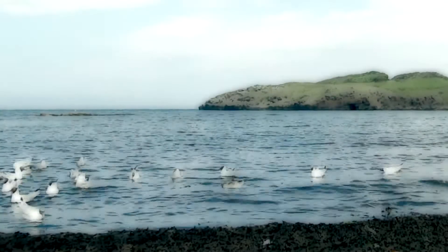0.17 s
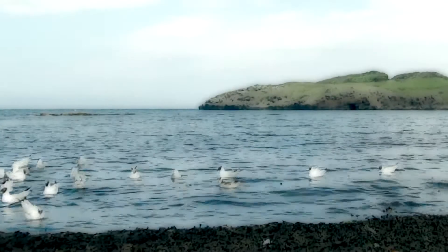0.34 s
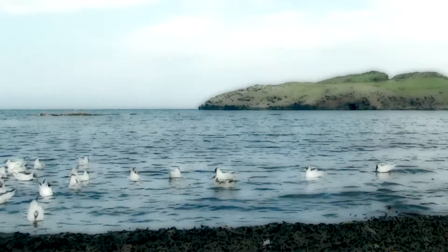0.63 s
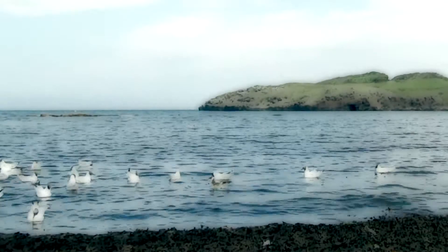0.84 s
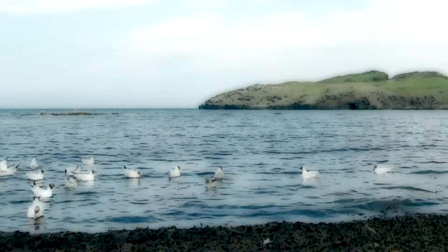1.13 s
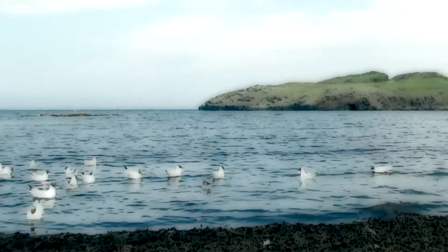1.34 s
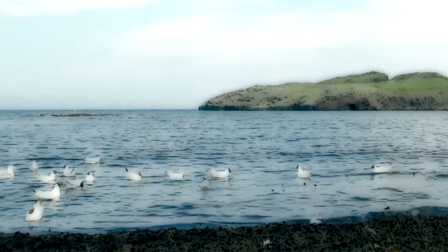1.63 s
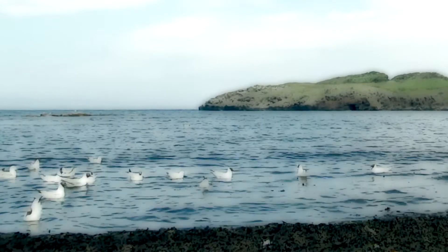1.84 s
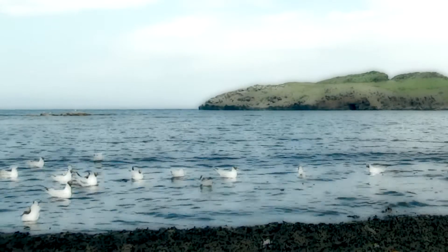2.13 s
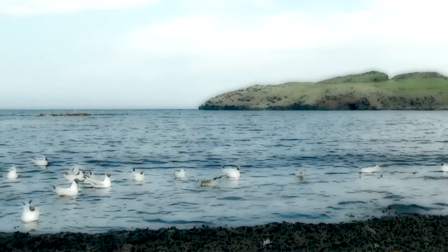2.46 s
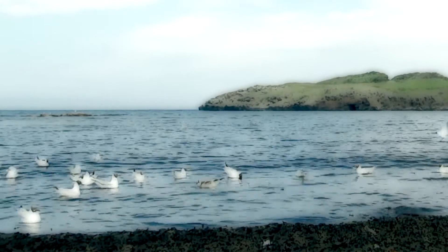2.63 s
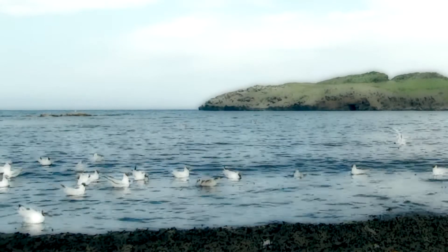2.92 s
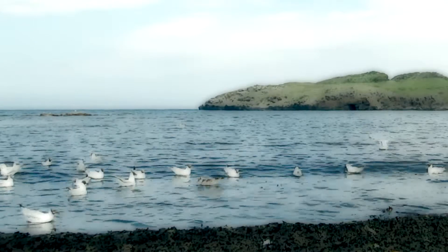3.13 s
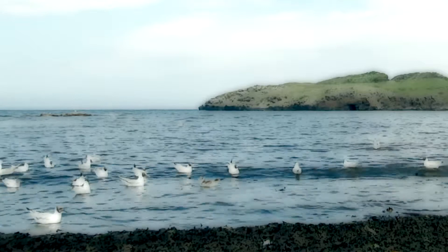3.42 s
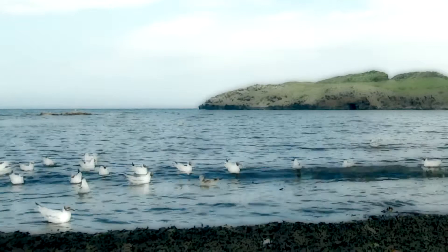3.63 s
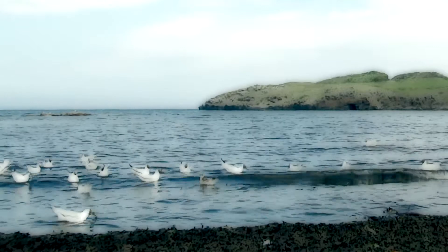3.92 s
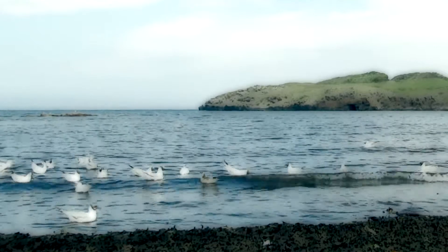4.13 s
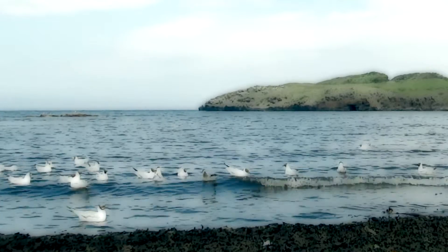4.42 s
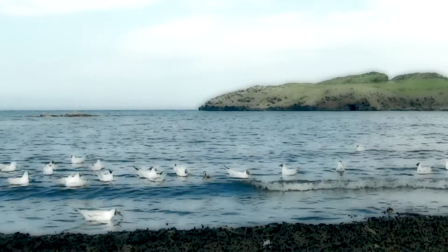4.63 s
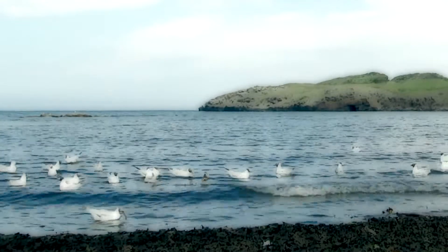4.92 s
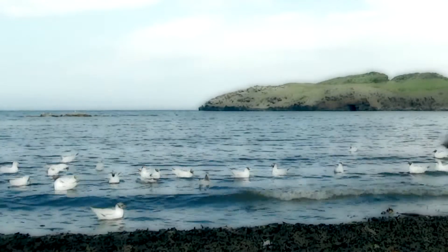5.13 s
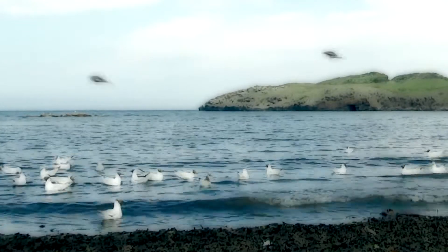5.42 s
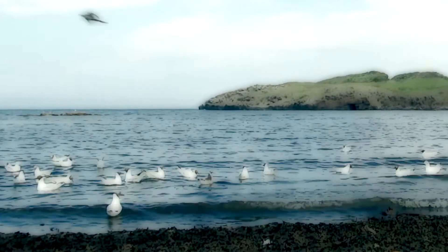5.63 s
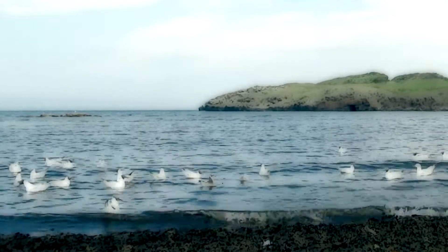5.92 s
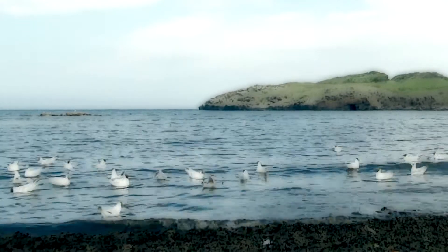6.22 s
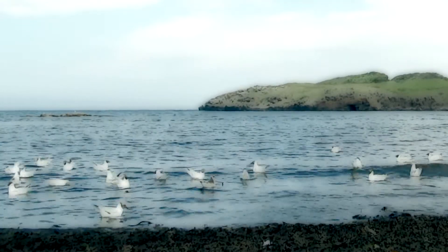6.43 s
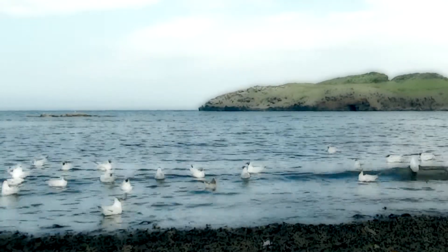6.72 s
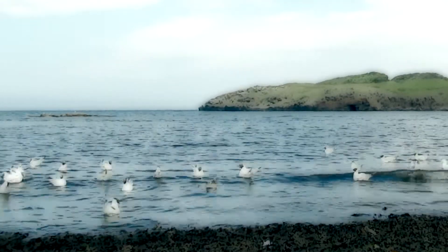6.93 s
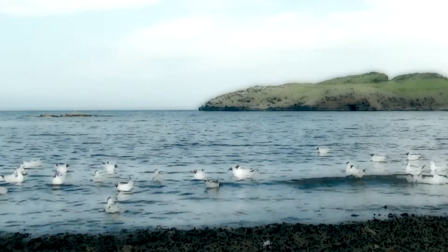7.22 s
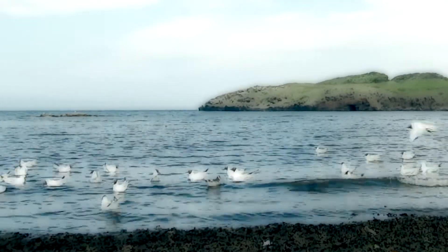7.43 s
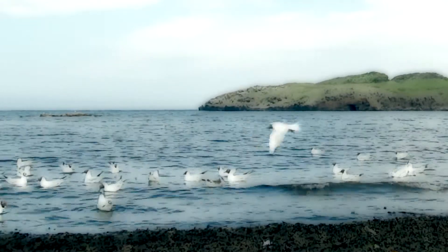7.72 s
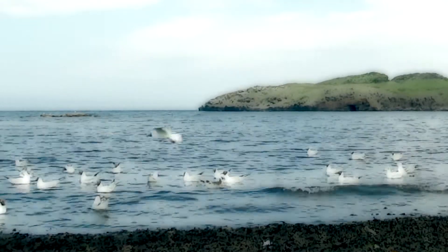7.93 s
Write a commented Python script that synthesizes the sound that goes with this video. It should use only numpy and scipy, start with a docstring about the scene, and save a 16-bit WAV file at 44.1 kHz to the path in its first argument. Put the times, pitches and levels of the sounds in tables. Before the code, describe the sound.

A flock of gulls calls on shallow water off a pebble beach, mixing short yelps, squeaks, wails and hoarse rattles. A quick run of loud barks comes early, then the cries grow more scattered. Small waves wash softly underneath, with faint fizzing foam and distant gull chatter. Gusts of wind hit the microphone with a dull rumble and lumpy thumps, strongest around the middle.

```python
"""On shallow water off a pebble beach, a flock of gulls barks, yelps, squeaks, wails and rattles.
Each cry is a stack of harmonics (whole multiples of one pitch) shaped by the bird's throat and bill.
Farther birds blur into the wash of small waves, and foam fizzes on the pebbles.
Gusts of wind buffet the microphone with a dull rumble and lumpy puffs."""
import sys
import numpy as np
from scipy import signal
from scipy.fft import rfft, irfft, next_fast_len
from scipy.io import wavfile
from scipy.ndimage import uniform_filter1d, map_coordinates

SR = 44100
rng = np.random.default_rng(int(sys.argv[2]) if len(sys.argv) > 2 else 0)


def digitize_waveform(pressure):
    """Quantize a signal to 16-bit integers and store it at the path in sys.argv[1].

    Rows of a 2-D input are taken as channels; values are limited to [-1, 1].
    """
    field = np.atleast_2d(pressure).T
    bounded = np.clip(field, -1, 1)
    quanta = np.round(bounded * 32767).astype(np.int16)
    wavfile.write(sys.argv[1], SR, quanta)


N = 356107


def amp(db):
    """Turn decibels into a plain multiplier."""
    return 10 ** (np.asarray(db) / 20)


def unit(x):
    """Scale a sound to an average (rms) strength of 1."""
    return x / np.sqrt(np.mean(x ** 2) + 1e-20)


def gain_at(points, hz):
    """Read a multiplier off (frequency_hz, level_db) points, on a log frequency axis."""
    point_hz, point_db = np.transpose(points)
    return amp(np.interp(np.log(hz + 1), np.log(point_hz + 1), point_db))


def over_time(points):
    """Join (time_s, value) points with straight lines, one value per sample."""
    return np.interp(np.arange(N) / SR, *np.transpose(points))


def wobble(per_s):
    """A smooth curve through per_s random values a second."""
    return map_coordinates(rng.standard_normal(int(N * per_s / SR) + 4), [np.arange(N) * per_s / SR])


def filtered(x, response):
    """Turn each frequency up or down by response(hz)."""
    size = next_fast_len(N + SR // 2)
    return irfft(rfft(x, size) * response(np.fft.rfftfreq(size, 1 / SR)), size)[:N]


def rush(spectrum, patchy_db):
    """Rushing noise with the given tone and short, wide patches that are louder or softer."""
    bands = signal.stft(rng.standard_normal(N), nperseg=512)[2]
    patches = uniform_filter1d(rng.standard_normal(bands.shape), size=24, axis=0)
    patches = uniform_filter1d(patches, size=7, axis=1)
    noise = signal.istft(bands * amp(patchy_db * unit(patches)), nperseg=512)[1][:N]
    return unit(filtered(noise, lambda hz: gain_at(spectrum, hz)))


# Tone of the low wash (waves and far flock) and of its bright hiss: frequency_hz, level_db
WASH_TONE = [(24, -12), (40, 5.5), (72, -4), (214, -18.5), (518, -16.5), (796, -24), (977, -22),
             (1570, -17), (2600, -25), (4000, -50), (9000, -90)]
HISS_TONE = [(1800, -39), (2800, -0.5), (3700, -2.5), (4600, 1), (6000, -7.5), (8000, -12.5), (10000, -41)]
# How loud the wash and the hiss are: time_s, level_db
WASH_LEVELS = [(0.0, -45), (0.27, -49), (1.55, -43.5), (1.82, -46), (2.27, -44), (2.74, -44), (3.48, -42.5),
               (4.58, -45), (4.81, -49), (5.77, -47.5), (8.07, -46)]
HISS_LEVELS = [(0, -57.5), (.2, -66.5), (.6, -65.5), (.75, -61.5), (.85, -60.5), (1.3, -59), (1.9, -60),
               (2.6, -57.5), (2.88, -62), (2.95, -54), (4.5, -53), (4.85, -60), (6.2, -59.5), (6.65, -63),
               (6.82, -61), (6.9, -54.5), (8.07, -61)]

def waves():
    """The far flock melts into the wash of small waves, whose hiss comes and goes."""
    wash, hiss = rush(WASH_TONE, patchy_db=2), rush(HISS_TONE, patchy_db=2)
    swell = wobble(9.3)
    wash_db = over_time(WASH_LEVELS) + 2.05 * swell
    hiss_db = over_time(HISS_LEVELS) + 1.3 * swell
    return amp(wash_db) * wash + amp(hiss_db) * hiss


# Tone of the foam: frequency_hz, level_db
FOAM_TONE = [(5000, -40), (8000, -1.5), (10000, -1), (15700, -9.5)]
# How loud the foam is: time_s, level_db
FOAM_LEVELS = [(0, -73), (.27, -81), (1.6, -75.5), (2.85, -77), (3.3, -69), (4.1, -70.5), (4.7, -73.5),
               (5.5, -76.5), (6.78, -79), (6.9, -68.5), (7.45, -72.5), (7.7, -74), (8.07, -73)]

def foam():
    """Foam fizzes on the pebbles, with scattered pops."""
    fizz = rush(FOAM_TONE, patchy_db=.8)
    pops = 1 + 4.5 * np.clip(wobble(300) - 2.1, 0, 1)
    return amp(over_time(FOAM_LEVELS) + 0.89 * wobble(9.5)) * pops * fizz


# Gusts of wind: start_s, length_s, strength_db
GUSTS = [(0.456, .7, -32.5), (1.315, .3, -33), (2.233, .12, -27.5), (3.14, .153, -31.5),
         (3.423, 0.0401, -36), (3.601, .42, -29), (4.103, .42, -23), (4.794, 0.0274, -37),
         (5.102, .16, -34), (5.569, .26, -29), (6.082, 0.0195, -36), (6.185, .17, -28), (6.525, .13, -33),
         (6.788, .09, -34), (7.543, .13, -33.5), (7.8, .11, -29.5)]

def wind_strength(calm_db=-45.5, rise_s=0.022, fall_s=0.06):
    """The wind's strength in dB: each gust swells out of the calm, holds and dies away."""
    t = np.arange(0, N, 64) / SR
    strength = np.full(len(t), amp(calm_db))
    for start_s, length_s, db in GUSTS:
        outside = np.maximum((start_s - t) / rise_s, (t - start_s - length_s) / fall_s)
        strength += amp(db) * np.exp(-np.maximum(outside, 0))
    return np.interp(np.arange(N) / SR, t, 20 * np.log10(strength))


# Tone of the wind on the microphone: frequency_hz, level_db
RUMBLE_TONE = [(15, -3.5), (30, -2), (100, -1.5), (250, -25), (500, -30), (900, -61.5)]

def wind_rumble(wind_db):
    """Wind buffets the microphone with a dull, lumpy rumble."""
    lumps = amp(6.5 * np.tanh(1.5 * wobble(16)))
    return amp(wind_db - 10) * unit(lumps * rush(RUMBLE_TONE, patchy_db=4.5))


# How well a gull's throat passes each frequency: frequency_hz, gain_db
THROAT_TONE = [(600, -25), (1300, -4.5), (2200, 1), (3000, -0.5), (5200, -1.5), (6300, -1), (7500, -5),
               (8500, -27), (10500, -20), (12500, -34), (15000, -28)]

def gull_voice(call, jitter, shimmer, waver, flap_hz=77.2, bill_sink=0.12):
    """One cry: harmonics on a curving pitch, shaped by the throat and by the bill ringing near bill_hz.
    Roughness and rattle run from 0 to 1; rise and fade are shares of the cry's length."""
    start_s, length_s, pitches, db, rough, rattle, bill_hz, width_hz, (rise, fade) = call
    first_hz, middle_hz, last_hz = pitches
    u = np.linspace(0, 1, round(length_s * SR))  # 0 at the start of the cry, 1 at its end
    t = u * length_s
    n = np.minimum(round(start_s * SR) + np.arange(len(u)), N - 1)
    pitch = first_hz * (1 - u) * (1 - 2 * u) + 4 * middle_hz * u * (1 - u) + last_hz * u * (2 * u - 1)
    flap = (flap_hz * t + 0.29 * waver[n]) % 1  # the airway flaps shut, not quite evenly
    bend = 0.17 * rattle * (flap - .5) + 0.01233 * waver[n]  # pitch climbs in each flap and drifts
    hoarse = (.11 * rough + .04 * np.exp(-t / .008)) * jitter[n]  # pitch shakes most at the start
    phase = 2 * np.pi * np.cumsum(pitch * (1 + bend + hoarse)) / SR
    k = np.arange(1, 14500 // pitch.max() + 1)[:, None]  # harmonic numbers
    ring_hz = bill_hz * (1 + bill_sink * (.5 - u))
    off_ring = (k * pitch - ring_hz) / width_hz
    bill_cut = np.sqrt(1 + (2 * off_ring) ** 6 / (1 + 4 * off_ring ** 2 * (1 - rattle)))
    uneven = amp(3.5 * np.sin(2.4 * k * k + 40 * start_s + 3 * u))
    strengths = uneven * gain_at(THROAT_TONE, k * pitch) / bill_cut
    # Sharp pulses ring in the bill, and smear when the voice is hoarse.
    lag = 2 * np.arctan(2 * (k * middle_hz - bill_hz) / width_hz) - .7 * rough * k * k
    voice = np.sum(strengths * np.cos(k * phase - lag), axis=0)
    voice *= 1 + 1.1 * rough * shimmer[n]
    chop = 1 - rattle * np.cos(np.pi * flap) ** 2
    fade_in, fade_out = t / (0.00072 + rise * length_s), ((1 - u) / fade) ** 1.07
    return amp(db) * np.clip(np.minimum(fade_in, fade_out), 0, 1) * chop * unit(voice)


def pitch_path(hz, slide=0, droop=0):
    """First, middle and last pitch of a cry that slides and droops at both ends, by shares of hz."""
    return hz * (1 - slide / 2) * (1 - droop), hz, hz * (1 + slide / 2) * (1 - droop)


# Gull barks: start_s, length_s, pitch_hz, slide_share_per_s, level_db, roughness, bill_hz, bill_width_hz
BARKS = [(0.0, 0.11, 961, -0.5, -51, 0.13, 1720, 1190), (0.049, 0.033, 2310, 2.5, -45, 0.26, 2300, 900),
         (0.502, 0.075, 471, 4.5, -53, 0.02, 2730, 2980), (1.44, 0.064, 511, 0, -40.5, 0, 2920, 1420),
         (1.568, 0.064, 472, 2, -41, 0, 2900, 1410), (1.659, 0.053, 835, -1.8, -35.5, 0.04, 4200, 1720),
         (1.941, 0.064, 473, 1, -49.5, 0.14, 2580, 1500), (2.057, 0.079, 519, 1, -35, 0.11, 3650, 3070),
         (2.156, .062, 511, 2.3, -32, 0.08, 3440, 2800), (2.258, 0.054, 487, 2.5, -33.5, 0.17, 3200, 3220),
         (2.347, 0.0547, 485, 3, -36, 0.3, 3670, 4150), (2.42, 0.054, 438, 2.3, -35.5, 0.17, 4920, 3840),
         (2.91, 0.037, 480, 4, -49.5, 0.17, 2900, 1800), (2.985, 0.037, 1270, -5.5, -50, .1, 1300, 500),
         (6.373, 0.21, 2720, -1.5, -55, 0.32, 2850, 1500), (7.29, 0.12, 474, 4, -49.5, 0.25, 3430, 3000)]

def barks(rise_fade=(0.12, 0.65)):
    """Abrupt cries on a sliding pitch."""
    for start_s, length_s, hz, slide, db, rough, bill_hz, width_hz in BARKS:
        pitches = pitch_path(hz, slide * length_s, droop=0.0274)
        yield start_s, length_s, pitches, db, rough, 0, bill_hz, width_hz, rise_fade


YELP_RISE_FADE = (0.16, 0.3)
# Gull yelps: start_s, length_s, top_pitch_hz, level_db, roughness, bill_hz
YELPS = [(0.102, 0.083, 500, -54, 0.07, 2500), (0.235, 0.025, 1060, -53, 0, 3160),
         (0.29, 0.042, 870, -58, 0, 2180), (0.528, 0.059, 502, -47, 0.68, 3060),
         (0.638, 0.064, 491, -50, 0.63, 2950), (0.793, 0.072, 902, -48.5, 0.08, 1800),
         (0.838, 0.087, 507, -48, 0.25, 2800), (1.123, 0.057, 2020, -47.5, 0.08, 3300),
         (1.36, 0.064, 606, -45.5, 0.94, 3830), (1.718, 0.033, 750, -49, 0.1, 3530),
         (1.767, 0.07, 2307, -42.5, 0, 3150), (1.867, 0.022, 910, -54, 0.3, 4100),
         (1.959, .1, 502, -46.5, 0.83, 3620), (2.482, 0.016, 954, -45.5, 0.5, 4000),
         (2.516, 0.052, 411, -42, 0.16, 4180), (3.361, 0.049, 2040, -39, 0.07, 2730),
         (3.69, 0.15, 510, -48.5, 0.2, 2650), (4.548, 0.04, 823, -50, 0, 1590),
         (4.711, 0.056, 2010, -49.5, 0, 3400), (4.957, 0.046, 886, -42.5, 0.45, 2640),
         (5.104, 0.049, 900, -40, 0.44, 2760), (5.968, 0.037, 970, -51.5, 0.2, 2260),
         (6.569, 0.032, 700, -48.5, 0.51, 3040), (6.704, 0.027, 704, -48, .6, 3460),
         (6.862, 0.06, 863, -47.5, 0.3, 2480), (6.934, 0.062, 472, -45.5, 0.22, 2720),
         (7.18, 0.059, 800, -51, 0.32, 3100), (7.627, 0.037, 986, -48.5, 0.13, 3250),
         (7.713, 0.095, 494, -50.5, 0.02, 3600), (8.023, 0.056, 870, -52, 0.18, 3640)]

def yelps():
    """Cries that arch up and down in pitch; hoarse ones ring over a wider band."""
    for start_s, length_s, hz, db, rough, bill_hz in YELPS:
        pitches = pitch_path(hz, droop=.13)
        width_hz = 0.8 * bill_hz + 350 * rough
        yield start_s, length_s, pitches, db, rough, 0, bill_hz, width_hz, YELP_RISE_FADE


def far_chatter(count=60):
    """Faint random cries from farther birds, loudest when the waves hiss most."""
    for when, long, high, loud, rough, bill in rng.random((count, 6)):
        start_s, length_s = when * N / SR, .04 + .12 * long ** 2
        hz = 450 + 550 * high
        db = np.interp(start_s, *np.transpose(HISS_LEVELS)) - 1 + 7.5 * loud
        bill_hz, width_hz = 1600 + 2600 * bill ** 2, 1000 + 1600 * bill
        yield (start_s, length_s, (.9 * hz, hz, .88 * hz), db, .1 + .5 * rough, .8 * long,
               bill_hz, width_hz, YELP_RISE_FADE)


# Gull squeaks: start_s, length_s, pitch_hz, level_db, bill_hz
SQUEAKS = [(.17, 0.026, 2540, -51, 2550), (2.045, 0.022, 3670, -47, 3700),
           (2.126, 0.053, 3600, -44.5, 3600), (2.211, 0.082, 3550, -45.5, 3600),
           (2.25, 0.016, 2010, -30, 4330), (2.298, 0.05, 3490, -45, 3600),
           (2.336, 0.029, 2004, -33.5, 4670), (2.361, 0.088, 2003, -47.5, 2000),
           (2.59, 0.078, 1950, -53.5, 2600), (5.377, 0.0074, 4500, -45.5, 4500),
           (5.447, 0.006, 4340, -46, 4500)]

def squeaks(slide_per_s=0.5, rough=0.064, width_hz=3400, rise_fade=(0.28, 0.55)):
    """Thin, high cries that barely rise; many lead into a bark."""
    for start_s, length_s, hz, db, bill_hz in SQUEAKS:
        pitches = pitch_path(hz, slide_per_s * length_s)
        yield start_s, length_s, pitches, db, rough, 0, bill_hz, width_hz, rise_fade


# Where the wailing gull's airway rings: centre_hz, width_hz, gain_db
LOW_RINGS, HIGH_RINGS = ([(850, 480, -6.5), (1440, 480, 0)],
                         [(4250, 1600, -4), (5740, 1040, -1), (9850, 1600, -22)])
# Long wails, one list of points each: time_s, pitch_hz, level_db, brightness_db
WAILS = [
    [(.33, 647, -59, -25.5), (.45, 668, -55.5, -41), (.75, 661, -48.5, -41), (.84, 625, -51, -8)],
    [(1.07, 714, -52, -9), (1.14, 793, -52, -3), (1.2, 824, -48, -2), (1.32, 781, -47, -4),
     (1.45, 707, -50, -12), (1.7, 656, -51.5, -8)],
    [(1.94, 653, -54, -25), (2.1, 750, -52.5, -19), (2.23, 722, -49, -22)],
    [(2.5, 690, -52, -25), (2.6, 722, -56.5, -27), (2.75, 643, -48.5, -13)],
    [(3.14, 823, -47, -2), (3.22, 879, -41.5, -5.5), (3.3, 825, -49, -6), (3.45, 756, -54, -1),
     (3.65, 709, -51, -3), (3.72, 637, -51, -9), (3.81, 580, -46.5, -16)],
    [(7.55, 733, -59, -22), (7.7, 742, -58, -27), (7.83, 800, -48, -20)],
]

def wails(throb_hz=64):
    """A farther gull's clear wails: a wider bill brings out the high rings, and the airway throbs."""
    def ringing(rings, hz):
        return sum(amp(db) / (1 + (2 * (hz - centre) / width) ** 4) for centre, width, db in rings)

    out, waver, jitter = np.zeros(N), wobble(25), wobble(300)
    k = np.arange(1, 16)[:, None]  # harmonic numbers
    for points in WAILS:
        times, *columns = np.transpose(points)
        n = np.arange(round(times[0] * SR), round(times[-1] * SR))
        pitch, db, bright_db = [np.interp(n / SR, times, column) for column in columns]
        phase = 2 * np.pi * np.cumsum(pitch * (1 + .006 * waver[n] + .018 * jitter[n])) / SR
        strengths = ringing(LOW_RINGS, k * pitch) + amp(bright_db) * ringing(HIGH_RINGS, k * pitch)
        voice = np.sum(strengths * np.sin(k * phase), axis=0)
        throb = 1 - 0.58 * np.cos(np.pi * throb_hz * n / SR + 0.81 * waver[n]) ** 2
        loudness = np.sqrt(2) * amp(db + 0.97 * waver[n[::-1]])
        out[n] += loudness * throb * voice * signal.windows.tukey(len(n), .1)
    return out


def puffs(times_s, levels_db, widths_ms):
    """Each swirl of air gives the microphone a quick push and a slower swing back."""
    out, t = np.zeros(N + SR), np.arange(-400, 1600) / SR
    signs = np.sign(rng.standard_normal(len(times_s)))
    for time_s, level, width_s, sign in zip(times_s, amp(levels_db), widths_ms / 1000, signs):
        push = np.exp(-(t / width_s) ** 2 / 2)
        back = 1.005 * np.exp(-((t - 2.6 * width_s) / (1.8 * width_s)) ** 2 / 2)
        out[round(time_s * SR):][:len(t)] += sign * level * (push - back)
    return out[400:N + 400]


def small_puffs(wind_db, count=320):
    """A crowd of small swirls that thickens with the gusts; weak ones are slower and duller."""
    when, weakness, spread = rng.random((count, 3)).T
    wind_so_far = np.cumsum(amp(.6 * wind_db))
    at = np.searchsorted(wind_so_far, when * wind_so_far[-1])
    db = wind_db[at] + 4.5 - 14 * weakness
    width_ms = 0.71 * amp(9 * (spread - .5) - 0.33 * (db + 22))
    return puffs(at / SR, db, np.maximum(width_ms, .5))


# The strongest swirls of air: time_s, level_db, width_ms
STRONG_PUFFS = [(0.616, -18.5, 0.68), (1.154, -25, 0.77), (1.192, -20, 0.71), (1.32, -25, 0.93),
                (1.916, -25.5, 1), (2.266, -26, 0.76), (2.317, -24.5, 0.63), (2.364, -15, 0.65),
                (3.24, -22.5, 0.5), (3.65, -18.5, 0.86), (3.796, -14, 0.83), (3.875, -25, 1),
                (3.997, -15.5, 0.99), (4.101, -17, 0.99), (4.145, -14, 0.47), (4.199, -20.5, 0.32),
                (4.218, -17, 0.44), (4.263, -18.5, 0.53), (4.34, -14.5, 0.81), (4.373, -20, 0.46),
                (4.452, -12, 0.85), (4.474, -16, 0.38), (4.8, -24.5, 0.76), (5.04, -19, 0.87),
                (5.123, -24.5, 0.63), (5.191, -21, 1), (5.229, -19.5, 0.57), (5.712, -20.5, 0.56),
                (5.736, -18, 0.84), (6.094, -25.5, 0.95), (6.195, -15, 0.49), (6.241, -20, 1),
                (6.282, -25.5, 0.38), (6.336, -18, 0.76), (6.528, -23, 0.76), (6.634, -24.5, 0.65),
                (6.857, -18, 0.82), (7.623, -24, 0.8), (7.896, -19.5, 0.69)]

def strong_puffs(delay_s=0.00401):
    """Single strong swirls thump the microphone."""
    time_s, db, width_ms = np.transpose(STRONG_PUFFS)
    return puffs(time_s + delay_s, db, np.maximum(width_ms, .4))


# Rattled gull cries: start_s, length_s, pitch_hz, end_pitch_ratio, level_db, roughness, rattle,
# bill_hz, bill_width_hz
RATTLES = [(0.764, 0.11, 898, 0.79, -47.5, 0.57, 0.4, 3300, 3080),
           (0.914, 0.095, 965, 0.96, -53, 0.2, 0.9, 5700, 900),
           (0.915, 0.19, 980, 0.71, -48, 0.67, 0.65, 1870, 900),
           (1.239, 0.59, 1055, 0.85, -45.5, 0.66, 0.3, 2040, 880),
           (1.24, 0.54, 1042, 0.76, -45.5, 0.8, 0.75, 4600, 4200),
           (2.642, 0.14, 722, 1, -46, 0.45, 0.9, 3740, 2320),
           (2.794, 0.043, 798, 1.1, -41.5, 0.38, 1, 3070, 3700),
           (2.932, 0.14, 873, 0.92, -48, 0.22, 0.57, 2880, 1940),
           (3.276, 0.039, 702, 1.05, -42, 0.68, 0.67, 4560, 2500),
           (3.484, 0.058, 746, 1.2, -42, 0.57, 0.84, 4270, 2510),
           (4.053, 0.085, 792, 1.03, -46.5, 0.6, 0.65, 4000, 2500),
           (4.291, 0.28, 700, 1, -41, 0.42, 0.52, 4620, 1300),
           (4.5, 0.055, 5670, 1.6, -50, 0.33, 0.36, 5500, 3000),
           (5.045, .055, 800, 1, -48.5, .4, 0.8, 4100, 1200),
           (5.225, 0.044, 800, 1.2, -44, 0.34, 0.8, 2950, 4900),
           (5.466, 0.3, 971, 0.92, -50.5, 0.46, 0.54, 2920, 1540),
           (6.314, 0.086, 1128, 0.74, -36.5, 0.54, 0.84, 4120, 2450),
           (6.462, 0.11, 1056, 0.83, -43, 0.27, 1, 3600, 3200),
           (6.717, 0.11, 1100, 0.82, -51, 0.35, 1, 2960, 2470),
           (7.832, 0.21, 905, 0.91, -46.5, 0.4, 1, 1920, 580),
           (7.851, 0.15, 1045, 1.2, -49.5, .4, 0.94, 5300, 2600)]

def rattles(rise_fade=(0.057, 0.48)):
    """Cries chopped up by the airway flapping shut."""
    for start_s, length_s, hz, end_ratio, db, rough, rattle, bill_hz, width_hz in RATTLES:
        pitches = (.95 * hz, hz, end_ratio * hz)
        yield start_s, length_s, pitches, db, rough, rattle, bill_hz, width_hz, rise_fade


def gulls(calls):
    """Voice each cry at its start time, with random shakes of pitch and loudness."""
    out = np.zeros(N + SR)
    jitter, shimmer, waver = wobble(700), wobble(900), wobble(18)
    for call in calls:
        cry = gull_voice(call, jitter, shimmer, waver)
        out[round(call[0] * SR):][:len(cry)] += cry
    return out[:N]


def over_water(cries, echo_s=0.13, echo_db=-15):
    """Scattered echoes from the waves and the beach blur each cry a little."""
    t = np.arange(SR // 4) / SR
    tail = amp(-60 * t / echo_s) * rng.standard_normal(len(t))
    return cries + amp(echo_db) * signal.fftconvolve(cries, tail / np.linalg.norm(tail))[:N]


def scene():
    """Gulls, shore and wind together in one channel."""
    calls = [*barks(), *yelps(), *far_chatter(), *squeaks(), *rattles()]
    flock = over_water(gulls(calls) + wails())
    shore = waves() + foam()
    wind_db = wind_strength()
    wind = wind_rumble(wind_db) + small_puffs(wind_db) + strong_puffs()
    return (flock + shore + wind)[None]


# How the microphone's housing colours the sound: frequency_hz, gain_db
HOUSING_TONE = [(600, 1), (800, -8.5), (1050, 1.5), (1100, -10), (1150, 1)]
TOP_HZ = 15710

def record(dry):
    """The microphone's housing dips two narrow bands; nothing above TOP_HZ is kept."""
    return filtered(dry[0], lambda hz: gain_at(HOUSING_TONE, hz) * (hz < TOP_HZ))[None]


dry = scene()
out = record(dry)
digitize_waveform(out)
```